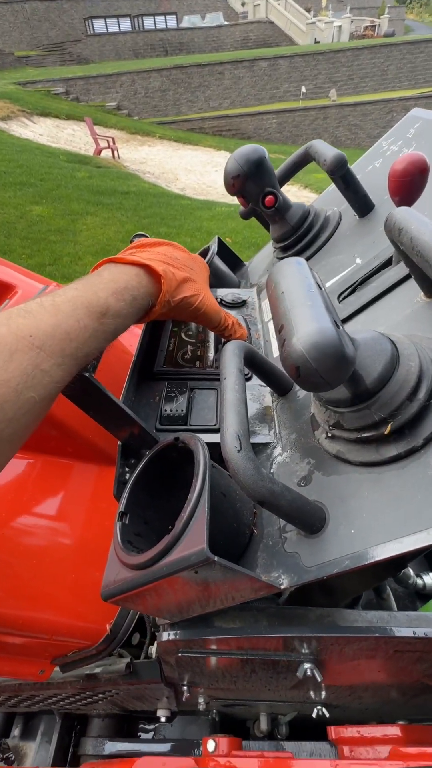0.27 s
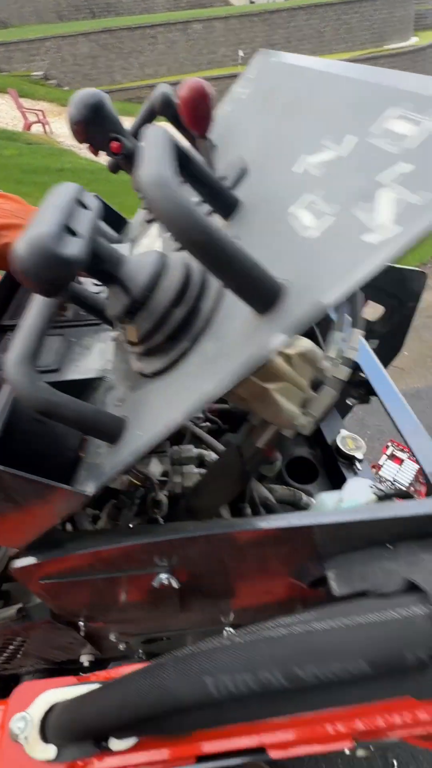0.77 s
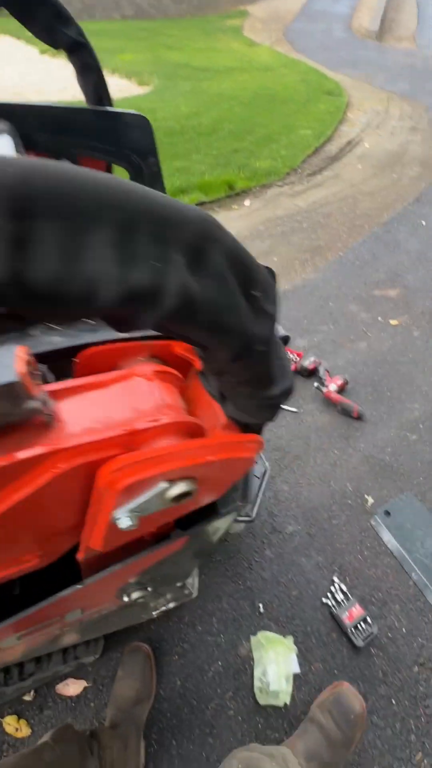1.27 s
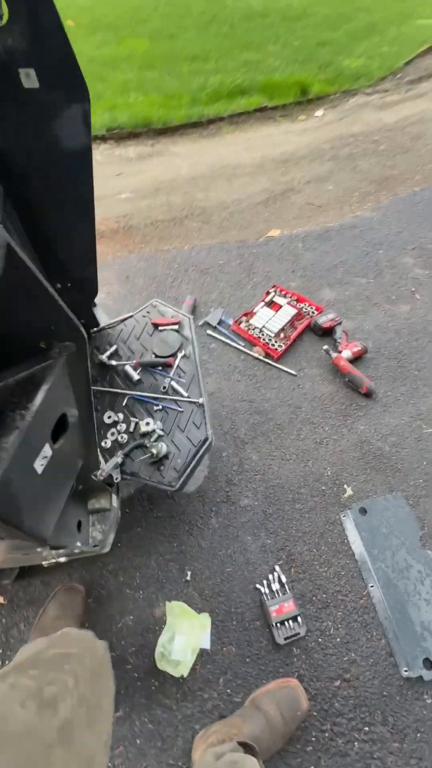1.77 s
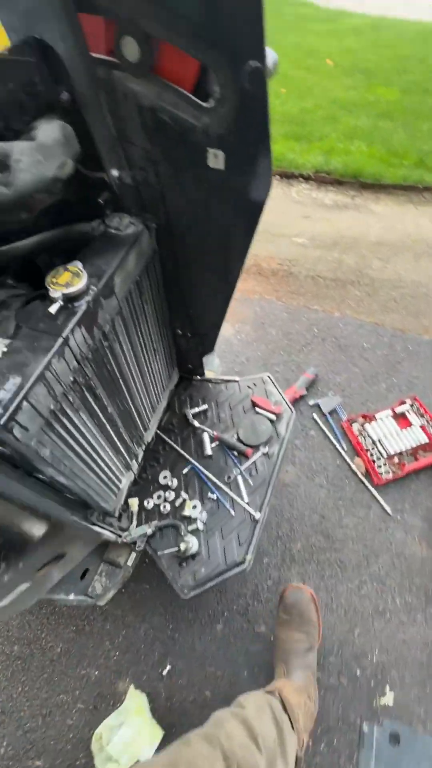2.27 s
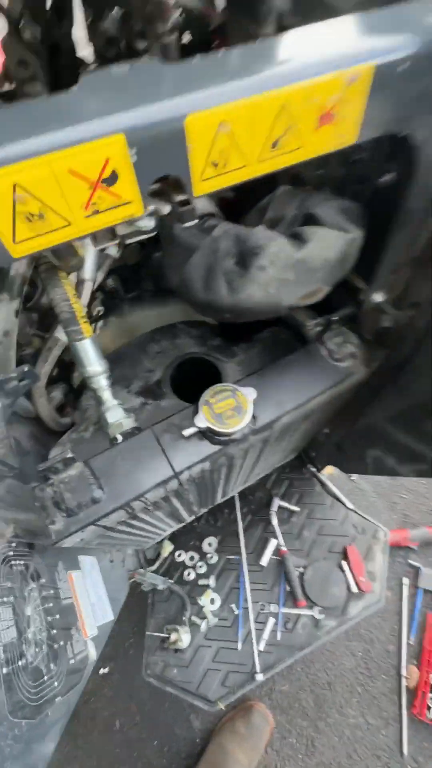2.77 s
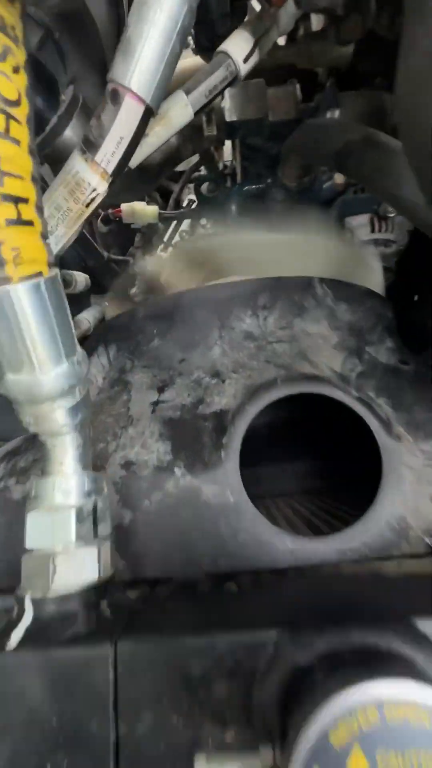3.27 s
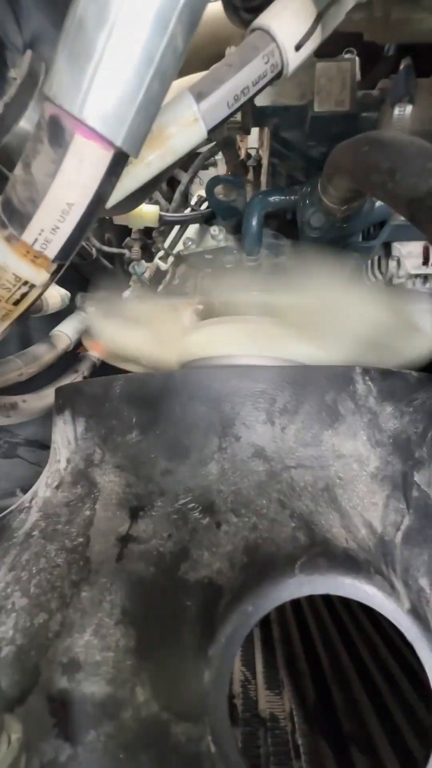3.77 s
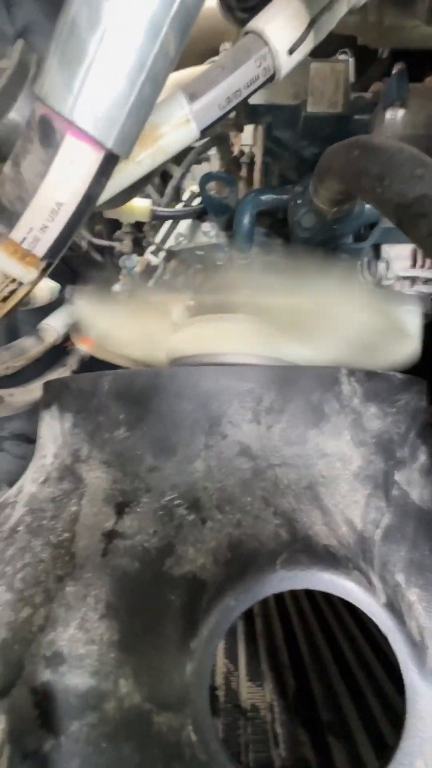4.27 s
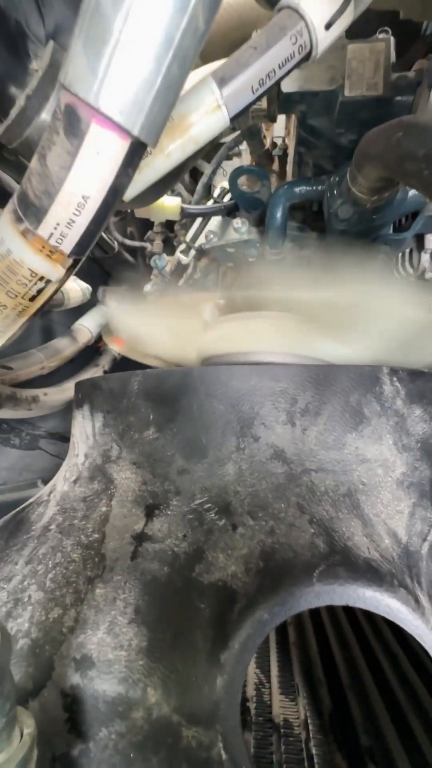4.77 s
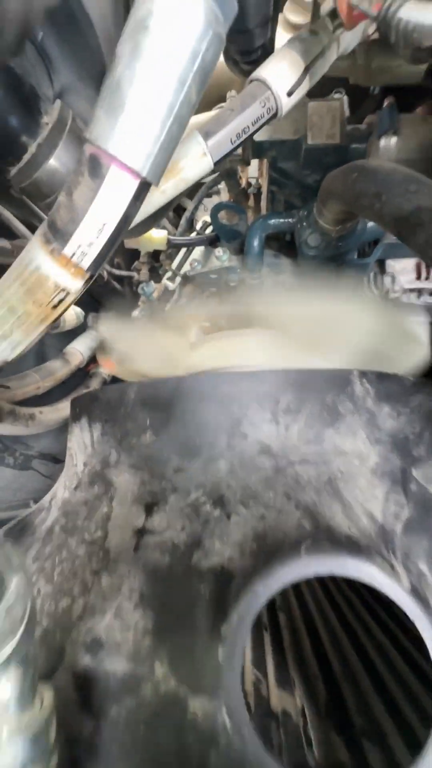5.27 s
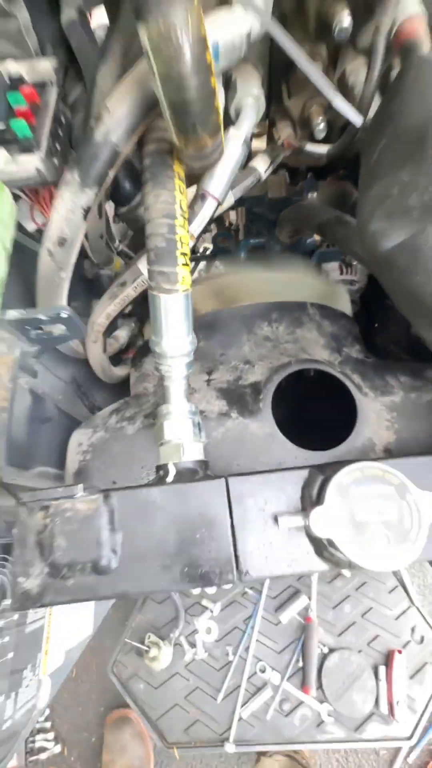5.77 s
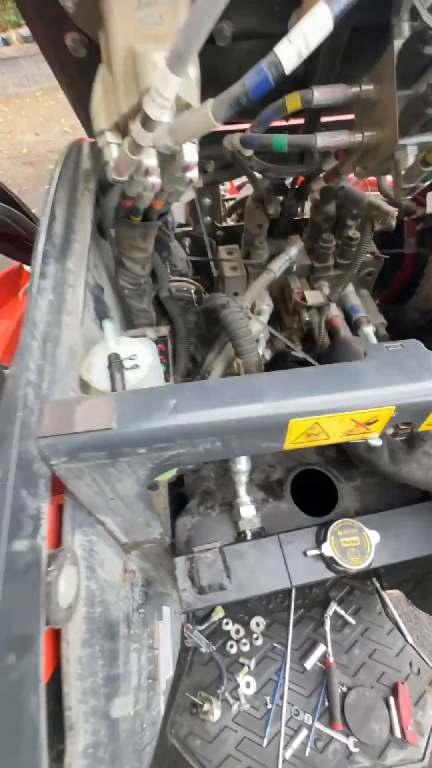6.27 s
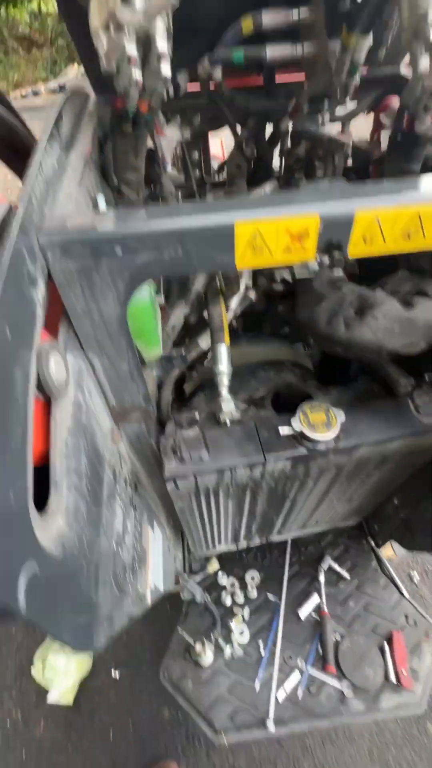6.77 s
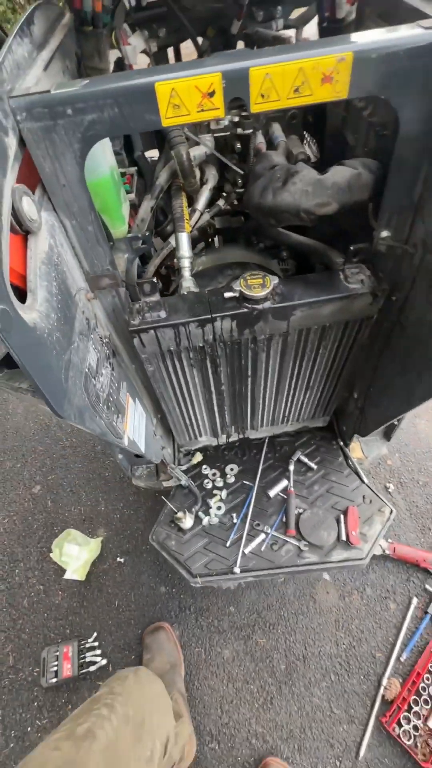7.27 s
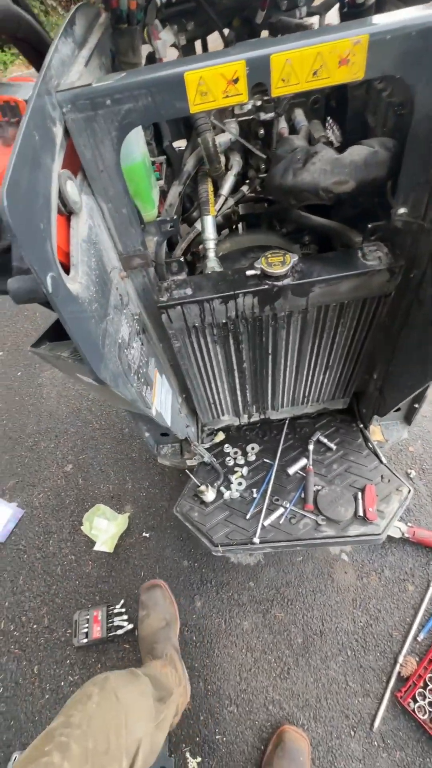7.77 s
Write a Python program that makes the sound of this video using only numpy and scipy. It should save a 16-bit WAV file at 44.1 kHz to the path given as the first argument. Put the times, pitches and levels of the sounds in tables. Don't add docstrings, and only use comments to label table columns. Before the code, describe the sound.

At 0 seconds an electric starter spins up with brush hiss; around 0.07 the pinion clunks in and grinds harshly, then whines as it cranks the engine. The first firings push through from about 0.2, and the starter lets go by 0.48. The small three-cylinder diesel surges slightly and settles by about 0.8 into a steady idle of roughly 27 firings a second. Beside the exhaust there is a thick low hum with thumping panels, clacking valve covers and broad fan air. From 1.5 to 3 the handheld microphone walks off and leans into the engine bay: exhaust recedes while iron knocks, injection ticks and faint gear tones come forward, strongest and hardest around 3 to 4. After 5 it draws back, and the uneven clatter grows gradually quieter and more distant, outdoors with no obvious echo. At 7.9 the idle cuts instantly to silence.

```python
import sys
import numpy as np
from scipy import signal
from scipy.fft import rfft, irfft, next_fast_len
from scipy.io import wavfile
from scipy.ndimage import uniform_filter1d, map_coordinates

SR = 44100
rng = np.random.default_rng(int(sys.argv[2]) if len(sys.argv) > 2 else 0)


def how_loud(loudness_db):
    steps = np.asarray(loudness_db, float) / 20
    return 10 ** steps


def generate_wav(sig):
    pcm = np.round(np.clip(np.atleast_2d(sig).T, -1, 1) * 32767).astype(np.int16)
    wavfile.write(sys.argv[1], SR, pcm)


N = 353285
CUT_S = 7.9015
PINION_S, WHINE_HZ, COMMUTATOR_HZ = .072, 852, 3940
PIPE_HZ, PIPE_WIDTH_HZ, IDLE_HZ = 67.5, 30, 26.85
FACING = 0.18

# time in seconds, gear mesh in Hz, grind in dB, whine in dB, brush hiss in dB.
STARTER = [
    (0, 417, -37, -54, -34.5),
    (.07, 411, -50, -39, -30.5),
    (.083, 425, -18, -31, -37),
    (.115, 411, -21.5, -23, -28),
    (.128, 424, -56, -30, -30),
    (.22, 423, -30, -30, -23.5),
    (.42, 419, -39.5, -35, -24),
    (.48, 418, -84, -82, -70),
]
# multiple of the mesh rate, level in dB.
MESH_HARMONICS = [(1, 0.5), (2.95, -5), (3.35, -10), (9.4, -16)]
# frequency in Hz, level in dB per Hz.
BRUSH_COLOUR = [(1760, -14.5), (3000, -12.5), (3570, -14.5), (4070, -21), (7560, -12.5), (8510, -17.5),
                (10100, -17.5), (15800, -27)]
# frequency in Hz, level in dB per Hz.
FAN_COLOUR = [(18, -44), (30, -8), (70, -11), (187, -3.5), (244, -9), (296, -4.5), (553, -9), (1110, -20.5),
              (2130, -14.5), (2990, -14.5), (3710, -23.5), (9500, -27.5), (15800, -40), (20900, -120)]

# time in seconds, firings counted (multiples of 3 are the first cylinder).
CRANK = [(0, 1.5), (.176, 4), (.2235, 5), (.2624, 6), (.3253, 8), (.445, 12), (.5073, 14), (.5792, 16),
         (.8, 22.13), (1.3, 35.85), (2.55, 70.03), (3.3, 90.65), (4.3, 118.05), (5.8, 159.23),
         (6.55, 179.85), (8.02, 220.44)]
# time in seconds, pipe in dB, combustion in dB, valve gear in dB, against idle.
CATCH = [(0, -21, -6.5, -15), (.06, -16, -15, -8.5), (.12, -12.5, -2.5, -15.5), (.17, -2, -11.5, -1.5),
         (.23, 1.5, -6.5, 2), (.32, 4, 0, 0), (.45, 0.5, -1, -4), (.62, -0.5, 0, 0)]
# time in seconds, peak in dB.
HARD_FIRINGS = [(.222, -10), (0.6488, -8), (1.7778, -10.5), (1.889, -7), (2, -7.5), (2.107, -7),
                (2.2176, -6), (2.3646, -4.5), (2.4367, -4.5), (2.695, -4.5), (2.9122, -7), (3.023, -5),
                (3.0955, -4.5), (3.1676, -3), (3.348, -3.5), (3.6787, -3), (3.8577, -8.5), (4.1857, -3),
                (4.4072, -7), (4.554, -7), (5.354, -10), (5.389, -8), (7.025, -13.5), (7.134, -15),
                (7.2794, -14.5), (7.4973, -13.5), (7.5677, -15.5), (7.7144, -14), (7.786, -13.5),
                (7.8934, -10.5)]

# firing order, level in dB, voice (cut to an integer: 0 or -3 pipe, 1 hum, 2 growl).
EXHAUST_ORDERS = [(1, -25, -3.5), (2, 2, 0.5), (3, 0, 1), (4, -8, -0.5), (5, -4.5, 2), (6, -9.5, 2),
                  (7, -2.5, 2.4), (8, -17, 2)]
# dB above the knock, gain facing the pipe in dB, gain in the bay in dB.
MANIFOLD_VOICES = [
    (-6.5, 7.5, 3.5),
    (-5.5, 5, 3.5),
]

# firings into the cycle, blow on the hood in dB, on the shroud in dB.
VALVES = [(.03, -9, -4), (.21, -9, 0), (.31, 0, -6), (.47, -5, -4), (.76, -11, -12), (1.1, -13, -7),
          (1.33, -8, -7), (1.65, -11, -13), (1.97, -15, -8), (2.3, -11, -7), (2.66, -12, -9)]
# frequency in Hz, width in Hz, level in dB.
HOOD = [(244.6, 45, -4), (296.7, 121, 1), (356.3, 69, 2.5), (420.5, 27, 5)]
# frequency in Hz, width in Hz, level in dB.
SHROUD = [(564.6, 108, -0.5), (635.6, 120, -2.5), (695, 63, -3)]
# frequency in Hz, width in Hz, level in dB.
COVERS = [(838, 110, 11.5), (1055, 92, 8.5), (1200, 134, 6.5), (1398, 63, 7.5), (1545, 93, 4)]
# firings into the cycle, frequency in Hz, width in Hz, level in dB above the clack.
TAPPET = (2, 923.5, 90, -6)
# frequency in Hz, width in Hz, level in dB.
IRON = [(1758, 103, 0.5), (1989, 59, 5.5), (2151, 93, 5.5), (2402, 204, 3), (2687, 148, 2), (2913, 51, 2),
        (3077, 49, 4.5), (3270, 280, -1.5), (4300, 220, -14), (6140, 190, -13.5), (6760, 180, -21.5),
        (5830, 160, -20)]
CASTING = [IRON[:2] + IRON[7:], IRON[2:4], IRON[4:7]]
# flanks in dB, head in dB, crown in dB, covers in dB.
CYLINDERS = [(-3, 1, -1.5, 0.5), (2, 0, -1, -1), (-2, 0.5, 2, 0)]
# frequency in Hz, level in dB per Hz.
TICK_COLOUR = [(2060, -35.5), (3500, -10.5), (3700, 2), (4980, -2), (6450, 3), (7270, -3), (7900, -5),
               (8570, -3.5), (13100, -15), (15800, -12)]
# firing order, dB above the knock.
GEARS = [(13, -26), (17, -33), (20, -24.5), (26, -26.5), (34, -30.5), (68, -26.5), (72, -25.5)]

# dB above the knock, gain facing the pipe in dB, gain in the bay in dB.
PARTS = [
    (-12, 1.5, 6.5),
    (-4.5, 8, 2.5),
    (-5.5, 4, -2.5),
    (1, 0.5, -2),
]
DULL = (0, 0.28, -0.089)
# left-right balance in dB, facing the pipe in dB, in the bay in dB.
COVERS_PAN = (-1.1, 2.3, -1.5)
# time in seconds, distance from the pipe 0-1, left-right balance in dB.
WALK = [(0, 0, -3.7), (1.2, 0, -3.8), (1.7, .08, -3), (2.1, .19, -1.5), (2.7, .28, -.2), (3.2, .31, 0),
        (4.5, .31, .6), (5.5, .31, .2), (8.1, .24, 0)]
# time in seconds, nearness of the block in dB, nearness of the pipe in dB,
# leaning into the bay 0-1, left-right balance in dB.
VIEW = [(0, -23.5, -20.5, 0.07, -2), (.9, -23.5, -21.5, 0.05, 0), (1.45, -28, -22, 0.2, 1),
        (1.9, -26, -25.5, .1, 0.3), (2.4, -22, -29.5, 0.4, 1), (2.7, -21, -30.5, 0.5, 1),
        (2.95, -20.5, -31, 0.65, 0), (3.3, -19, -27.5, 0.93, -0.6), (3.9, -22.5, -29, 1, 0),
        (4.5, -24, -29, 0.97, -.5), (5.05, -25, -31.5, .9, -0.5), (5.6, -27.5, -33, 0.6, -1),
        (5.95, -30.5, -39, 0.5, 0.5), (6.5, -31.5, -38.5, 0, -1), (7.2, -32.5, -41.5, 0.1, -0.5),
        (7.9, -34, -40.5, 0, -0.7)]
# frequency in Hz, left-right likeness 0-1.
ALIKE = [(60, .99), (290, 1), (640, 0.97), (1400, 1), (2500, 0.25), (4000, 0.54), (7000, 0.27), (10500, 1),
         (16000, 0.39)]
# frequency in Hz, lead of the left in radians.
LEFT_LEAD = [(60, 0), (400, 0.34), (700, 1.17), (1100, 0.91), (2400, 0.48), (4000, 0.62), (7700, -1.8),
             (10400, -2), (16000, -10.5)]
# frequency in Hz, left-right balance in dB.
BODY_SHADE = [(200, -0.5), (500, 2), (1000, 3), (2400, -0.5), (4400, 0), (12000, 0)]
# low edge in Hz, high edge in Hz, share of moments kept.
THIN_BANDS = [(10350, 13900, .09), (13900, 14500, .22), (14500, 15000, .3), (15000, 15500, .4),
              (15500, 16000, .33), (9750, 10350, .65)]


def unit(x):
    return x / np.sqrt(np.mean(np.square(x)) + 1e-20)


def along(points, hz):
    f, v = np.transpose(points)
    return np.interp(np.log(hz + 1), np.log(f + 1), v)


def curves(rows):
    s, *cols = np.transpose(rows)
    return [np.interp(np.arange(N) / SR, s, c) for c in cols]


def wobble(rate):
    knots = rng.standard_normal(int(N * rate / SR) + 4)
    return map_coordinates(knots, [np.arange(N) * rate / SR])


def filtered(x, response):
    m = next_fast_len(N + SR // 4)
    spectrum = rfft(x, m) * response(np.fft.rfftfreq(m, 1 / SR))
    return irfft(spectrum, m)[..., :N]


def modes(table):
    def response(f):
        total = 0
        for k, (centre, width, db) in enumerate(table):
            damping = 1j * f * width
            total = total + (-1) ** k * how_loud(db) * damping / (centre * centre - f * f + damping)
        return total
    return response


def ports(pair, pan_db):
    side = np.array([[1], [-1]])

    def path(k, share):
        def response(hz):
            turn = np.arccos(np.clip(along(ALIKE, hz), -1, 1)) / 2
            lead = np.exp(.5j * side * along(LEFT_LEAD, hz))
            return share(turn) * lead * how_loud(side * along(BODY_SHADE, hz) / 2)
        return filtered(pair[k], response)

    return (path(0, np.cos) + side * path(1, np.sin)) * how_loud(side * pan_db / 2)


def viewpoint(rules):
    near_db, _, lean, pan_db = curves(VIEW)
    facing = np.clip(1 - curves(WALK)[0] / FACING, 0, 1)
    return near_db, pan_db, [base + at_pipe * facing + in_bay * lean for base, at_pipe, in_bay in rules]


def crank():
    return uniform_filter1d(curves(CRANK)[0], size=1501, mode="nearest")


def blows(counts, db):
    at = np.searchsorted(crank(), counts)
    keep = (at > 0) & (at < N)
    return np.bincount(at[keep], how_loud(db)[keep], N)


def burst(train, rise_s, t60_s):
    t = np.arange(SR // 8) / SR
    envelope = (1 - np.exp(-t / rise_s)) * how_loud(-60 * t / t60_s)
    flare = signal.fftconvolve(train, envelope)[:N]
    grit = how_loud(1.7 * np.array([wobble(900), wobble(900)]))
    return flare * grit * rng.standard_normal((2, N))


def starter():
    mesh_hz, grind_db, whine_db, hiss_db = curves(STARTER)
    t = np.arange(N) / SR
    phase = 2 * np.pi * np.cumsum(mesh_hz) / SR
    grind = sum(how_loud(db + 4 * wobble(120)) * np.sin(k * phase + 1.1 * wobble(120)) for k, db in MESH_HARMONICS)
    whine = how_loud(1.5 * wobble(48)) * np.sin(2 * np.pi * WHINE_HZ * t + 0.35 * wobble(40))
    bars = how_loud(-14 + 3 * wobble(60)) * np.sin(2 * np.pi * COMMUTATOR_HZ * t + 1.2 * wobble(90))
    hiss = unit(filtered(rng.standard_normal((2, N)), lambda hz: how_loud(along(BRUSH_COLOUR, hz))))
    brushes = how_loud(hiss_db + 1.8 * wobble(50)) * (hiss + bars)
    pinion = np.arange(N) == round(PINION_S * SR)
    clunk = filtered(burst(pinion, 0.0017, 0.099), modes(COVERS + IRON[:8]))
    return how_loud(grind_db) * grind + how_loud(whine_db) * whine + brushes + how_loud(-15.0) * clunk


def fan():
    near_db, _, _ = viewpoint([])
    knock_db = near_db + curves(CATCH)[1]
    air = unit(filtered(rng.standard_normal((2, N)), lambda hz: how_loud(along(FAN_COLOUR, hz))))
    air = filtered(air, lambda hz: 1 - .35 * np.exp(-np.log(hz / 430 + 1e-9) ** 2 / .5))
    return how_loud(knock_db - 4.0 + 0.4 * wobble(4.3)) * air


def pipe_resonance_db(order):
    def gain_db(hz):
        return -10 * np.log10(1 + ((hz - PIPE_HZ ** 2 / hz) / PIPE_WIDTH_HZ) ** 2)
    firing_hz = np.gradient(crank()) * SR + 1e-3
    return gain_db(order * firing_hz) - gain_db(order * IDLE_HZ)


def exhaust():
    near_db, _, manifold_db = viewpoint(MANIFOLD_VOICES)
    distance, pan_db = curves(WALK)
    voice_db = np.array([curves(VIEW)[1], *(near_db + manifold_db)]) + curves(CATCH)[0]
    side = np.array([[1], [-1]])
    catching = np.clip(2.4 - 3.5 * np.arange(N) / SR, 0, 1)
    turn = .11 * side * pan_db
    out = np.zeros((2, N))
    for order, db, voice in EXHAUST_ORDERS:
        late = (1.3 * order + 5 * (order == 3)) * distance + .4 * order * catching
        phase = 2 * np.pi * order * crank() + .6 - np.pi * (order > 5) - late + .15 * wobble(7)
        shade_db = -35 * (order > 5) * np.clip(.2 - distance, 0, 1)
        level_db = voice_db[int(voice)] + pipe_resonance_db(order) + db + shade_db
        out += how_loud(level_db + 2.5 + 0.69 * wobble(6)) * np.cos(phase + turn)
    return out * how_loud(side * pan_db / 2)


def firings(knock_db):
    count, turns = np.arange(4, int(CRANK[-1][1])), crank()
    chance = rng.standard_normal((len(count), 5))
    size_db = -1.7 + 1.5 * chance[:, 0]
    when = count + .015 + .025 * chance[:, 1]
    for s, peak_db in HARD_FIRINGS:
        at = round(s * SR)
        nearest = round(turns[at]) - 4
        when[nearest] = turns[at] + .005
        size_db[nearest] = peak_db - knock_db[at] - 15.5
    lean = chance[:, 2:] - chance[:, 2:].mean(axis=1, keepdims=True)
    return when, size_db, lean


def valve_gear():
    cycle = 3 * np.arange(1, int(CRANK[-1][1]) // 3 + 1)[:, None]
    angle, *part_db = np.transpose(VALVES)
    shake = rng.standard_normal((len(cycle), len(VALVES), 2))
    when = (cycle + angle + .004 * shake[..., 0]).ravel()
    return [blows(when, (db + .9 * shake[..., 1]).ravel()) for db in part_db]


def tappet():
    angle, hz, width_hz, db = TAPPET
    cycle = 3 * np.arange(1, int(CRANK[-1][1]) // 3 + 1)
    shake = rng.standard_normal((len(cycle), 2))
    ping = burst(blows(cycle + angle + 0.018 * shake[:, 0], 1.4 * shake[:, 1]), .001, 0.031)
    return how_loud(db) * unit(filtered(ping, modes([(hz, width_hz, 0)])))


def sheet_metal(hood, shroud):
    def soft(hz):
        return 1 / (1 + 1j * hz / 900) ** 2
    facing = how_loud(-38 * np.clip(.2 - curves(WALK)[0], 0, 1))
    thump = filtered(hood, lambda hz: soft(hz) * modes(HOOD)(hz))
    thump = thump + 2.02 * facing * filtered(shroud, lambda hz: soft(hz) * modes(SHROUD)(hz))
    rattle = unit(filtered(burst(hood + facing * shroud, 0.0012, 0.24), modes(HOOD + SHROUD)))
    return unit([thump, np.roll(thump, 190)]) + .22 * rattle


def block():
    near_db, _, (tick_db, thump_db, clack_db, gear_db, dull) = viewpoint(PARTS + [DULL])
    _, fire_db, valve_db = curves(CATCH)
    knock_db = near_db + fire_db
    tick_db = tick_db - fire_db
    thump_db = thump_db - fire_db + valve_db
    when, size_db, lean = firings(knock_db)
    hood, shroud = valve_gear()
    own_db = np.transpose(CYLINDERS)[:, np.round(when).astype(int) % 3]

    iron = np.zeros((2, N))
    for table, part_db in zip(CASTING, 2.53 * lean.T + own_db[:3]):
        blow = blows(when, size_db + part_db)
        iron += filtered(burst(blow + 0.04 * shroud, 0.0006, 0.075) + 9 * blow, modes(table))
    iron = iron + dull * filtered(iron, lambda hz: np.tanh((2450 - hz) / 250))

    injection = blows(when + 0.067 * lean[:, 0], size_db + 2.5 * lean[:, 1])
    tick = burst(injection + 0.27 * shroud + 0.00005, 0.0026, 0.046)
    tick = filtered(tick, lambda hz: how_loud(along(TICK_COLOUR, hz)))
    fire = blows(when, size_db + own_db[3])
    clack = filtered(burst(fire + 0.15 * shroud, 0.00064, 0.1), modes(COVERS))
    thump = sheet_metal(hood, shroud)
    gears = sum(how_loud(db + 1.1 * wobble(3.16)) * np.sin(2 * np.pi * order * crank() + 1.08 * wobble(12))
                for order, db in GEARS)

    body = how_loud(1.5) * unit(iron) + how_loud(tick_db + 0.5) * unit(tick)
    body = body + how_loud(thump_db - 0.15) * thump + gears * how_loud(13 + gear_db)
    covers = how_loud(knock_db + clack_db - 1.0) * (unit(clack) + tappet())
    return how_loud(knock_db) * body, covers


def scene():
    _, pan_db, (covers_db,) = viewpoint([COVERS_PAN])
    body, covers = block()
    machine = ports(starter() + fan() + body, pan_db)
    return machine + exhaust() + ports(covers, pan_db + covers_db)


def thin_centre(mid):
    hz, _, z = signal.stft(mid, SR, nperseg=2048)
    luck = rng.random((len(THIN_BANDS), z.shape[1]))
    level = np.log(np.sum(np.abs(z[hz > 4000]) ** 2, axis=0) + 1e-12)
    jump = np.diff(level, prepend=0) + .2 * level + 1.5 * luck[0]
    luck[0] = np.argsort(np.argsort(-jump)) / len(jump)
    hz, t, z = signal.stft(mid, SR, nperseg=256)
    luck = luck[:, np.minimum(np.round(t * SR / 1024).astype(int), len(jump) - 1)]
    keep = (hz < THIN_BANDS[-1][0])[:, None] * np.ones(z.shape)
    for (low, high, share), row in zip(THIN_BANDS, luck):
        keep[(hz >= low) & (hz < high)] = (row < share) | (luck[0] < THIN_BANDS[0][2])
    keep[(hz > THIN_BANDS[0][0]) & (hz < THIN_BANDS[0][1])] *= how_loud(-8)
    return signal.istft(z * keep, SR, nperseg=256)[1][:N]


def roll_off(x):
    return signal.sosfilt(signal.butter(12, 17090, fs=SR, output="sos"), x)


def record(dry):
    x = dry / (1 + np.abs(dry / .98) ** 5) ** (1 / 5)
    x = filtered(x, lambda hz: hz < 15850)
    mid, side = thin_centre((x[0] + x[1]) / 2), (x[0] - x[1]) / 2
    cut = np.clip((CUT_S - np.arange(N) / SR) / .002, 0, 1)
    return roll_off(np.array([mid + side, mid - side]) * cut)


dry = scene()
out = record(dry)
generate_wav(out)
```